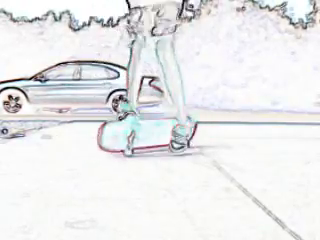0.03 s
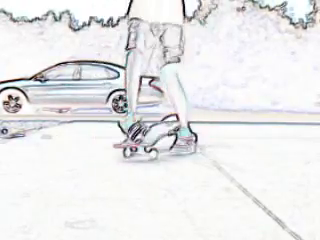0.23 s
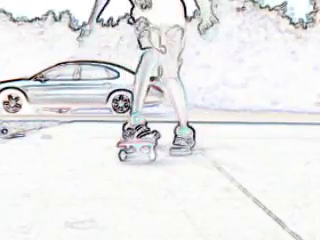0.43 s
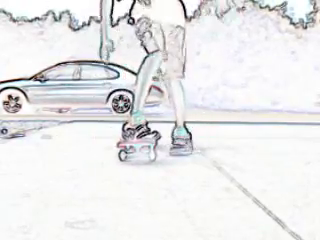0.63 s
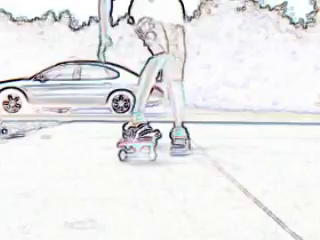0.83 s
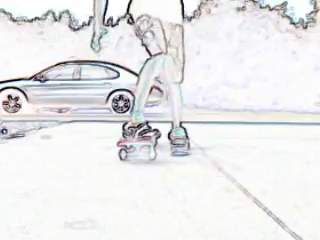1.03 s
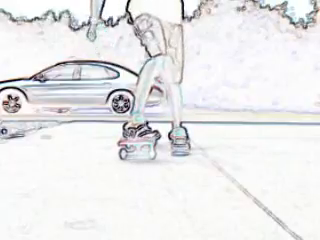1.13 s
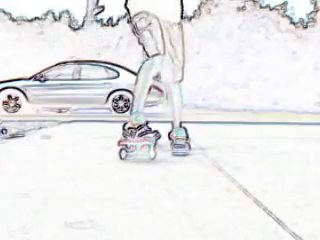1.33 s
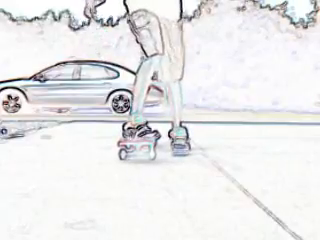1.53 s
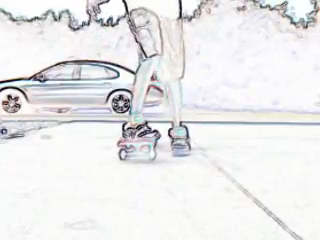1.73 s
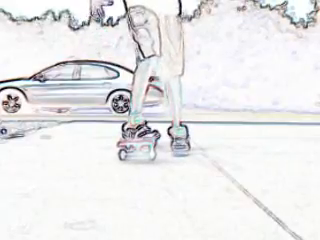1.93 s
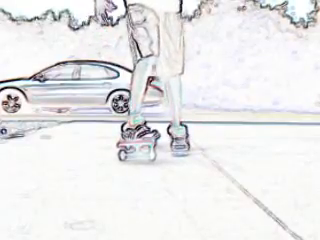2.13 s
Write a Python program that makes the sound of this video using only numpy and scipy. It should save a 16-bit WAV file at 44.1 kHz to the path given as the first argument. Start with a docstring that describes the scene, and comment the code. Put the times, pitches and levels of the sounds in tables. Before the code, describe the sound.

Close up on a quiet street, a skateboard slams down and its deck rattles. A shoe slap and several lighter knocks follow as the wheels scrape and settle, leaving faint grit ticks and a low idling engine.

```python
"""A skateboard lands on concrete: edge and wheels slam in quick turn, the deck rings and shudders.
A shoe slaps down, the tilted board drops back on its wheels with a run of weaker knocks.
Wheels scrape, grit ticks under the sole, a truck creaks as the rider finds balance.
Behind it a quiet street: air, an idling engine, distant machinery and a faint insect."""
import sys
import numpy as np
from scipy import signal
from scipy.fft import rfft, irfft, next_fast_len
from scipy.io import wavfile

SR = 44100
rng = np.random.default_rng(int(sys.argv[2]) if len(sys.argv) > 2 else 0)


def store_wav(level_fs):
    """Save 16-bit WAV to argv[1]."""
    pcm = np.round(np.clip(np.atleast_2d(level_fs), -1, 1) * 32767)
    wavfile.write(sys.argv[1], SR, pcm.T.astype(np.int16))


N = 97020
T = np.arange(N) / SR

# landing blows: start_s, wood_db, click_db
SLAMS = [(0.1177, -29.5, -37), (.124, -19, -31.5), (.128, -14, -53), (0.1321, -29, -20.5),
         (0.1441, -23, -26), (0.1481, -13, -45.5), (0.1516, -6.5, -12), (0.1701, -10.5, -13),
         (0.189, -5.5, -9), (.203, -9, -24), (0.2166, -12, -19.5), (0.28, -19, -27)]
# bounces after the slam: start_s, level_db
SHUDDERS = [(.237, -19), (.274, -24.5), (.3365, -28.5), (.356, -28)]
# sole on the ground: start_s, rubber_db, grit_db
SLAPS = [(0.4086, -25, -46), (.416, -21, -27.5), (.4238, -15.5, -25.5), (0.4315, -15, -30),
         (0.439, -26, -35), (0.4677, -13, -24.5)]
# wheels dropping back: start_s, wood_db, clack_db, click_db
KNOCKS = [(0.5356, -16, -11.5, -22.5), (0.5387, -15, -22, -23.5), (0.5516, -14, -15.5, -26),
          (.5553, -12, -29, -21.5), (0.5594, -14.5, -11.5, -39.5), (0.6156, -25, -22, -33.5),
          (0.6442, -28.5, -22, -32), (.654, -32.5, -24.5, -39), (0.6785, -42, -28, -49),
          (.6905, -29, -20.5, -42)]
# rider's weight arriving: start_s, level_db, pitch_hz, t60_s
THUDS = [(0.1298, -2.5, 244, 0.015), (.1482, -2, 191, 0.019), (0.1717, -6, 202, 0.053),
         (0.19, -3.5, 190, 0.022), (.536, -13.5, 171, .035), (0.553, -18, 106.4, 0.11)]
# wheel friction envelope: time_s, rumble_db, hiss_db
SCRAPE_LEVELS = [(.14, -75, -86), (0.156, -15, -73), (.21, -23.5, -34), (0.261, -27, -51),
                 (.33, -28.5, -44.5), (0.399, -34.5, -48), (.445, -30.5, -50), (.525, -38.5, -57),
                 (.55, -38, -56), (0.57, -23, -38.5), (0.607, -33, -49.5), (0.654, -28, -50),
                 (0.675, -45, -58.5), (.87, -56.5, -72), (1.15, -62, -86)]
# grit under the shoe: start_s, level_db
GRIT_TICKS = [(0.794, -45.5), (0.813, -41.5), (.818, -45), (0.8285, -45.5), (.855, -44.5)]
# rubs as the weight shifts: start_s, length_s, level_db, centre_hz, width_hz
RUBS = [(0.674, 0.088, -44.5, 1140, 650), (0.75, 0.07, -54.5, 520, 70), (1.405, .09, -57, 310, 110),
        (1.56, .4, -68, 1700, 1000), (1.385, 0.26, -66.5, 11500, 4500)]
# truck slips: start_s, level_db
CREAKS = [(0.987, -57), (1.457, -54.5), (1.484, -57)]

# deck and truck modes: pitch_hz, slam_db, drop_db, t60_s
DECK_MODES = [(161.5, -22, -21, 0.32), (183.6, -27.5, -20, 0.271), (317.3, -11, -30.5, 0.18),
              (374, -29.5, -26, 0.41), (532.3, -17, -20.5, 0.22), (590, -19.5, -16.5, 0.19),
              (747.7, -17, -17.5, 0.26), (806, -27, -20.5, 0.208), (964, -19, -52, 0.2),
              (1388, -25, -23, 0.38), (1675, -30, -24, 0.17), (1856, -25.5, -26.5, 0.22),
              (2065, -24, -45, 0.2), (2260, -21.5, -32, 0.21), (2435, -24, -28, 0.096)]
# truck modes: pitch_hz, level_db, t60_s
TRUCK_MODES = [(1070, -1.5, 0.022), (1373, -4.5, 0.028), (1690, -10, 0.028)]
# shoe and leg modes: pitch_hz, level_db, t60_s
SOLE_MODES = [(151, -5, 0.099), (260, -0.5, 0.032), (385, -8, 0.038), (1010, -5, 0.039)]

# contact spectra: freq_hz, relative_db
WOOD_SPECTRUM = [(50, -8.5), (130, -19), (320, 3.5), (470, -14.5), (800, 0), (1300, -8.5), (2300, -11.5),
                 (3100, -17), (4000, -34), (8000, -38)]
CLICK_SPECTRUM = [(1500, -7.5), (3000, -5.5), (5000, -14), (7000, -5.5), (10300, -6), (11500, 5.5),
                  (12800, 0), (14000, -5), (15500, -9), (17000, -24)]
RUBBER_SPECTRUM = [(300, -2), (1000, -11), (1600, -14.5), (2700, -8.5), (5000, -52)]
TRUCK_SPECTRUM = [(60, -5.5), (250, 3.5), (700, -1), (900, -17), (1600, -1.5), (2200, -9.5), (3200, -15),
                  (4500, -30), (8000, -29)]
RATTLE_SPECTRUM = [(35, 1), (90, 1.5), (370, 0), (800, -5.5), (1300, -8.5), (2300, -17.5), (3300, -23.5),
                   (4800, -34), (9000, -33.5)]
TICK_SPECTRUM = [(3000, -11), (5800, -2), (12000, -4), (16000, -17)]

# outdoor air: freq_hz, relative_db
AIR_SPECTRUM = [(15, -35), (25, -1.5), (105, -1), (141, -11.5), (309, -19.5), (700, -22.5), (1650, -25),
                (4700, -30.5), (11600, -32), (16000, -34.5)]
# steady hums: centre_hz, level_db, width_hz
HUMS = [(735, -70, 90), (1700, -77.5, 117.6), (8360, -76.5, 700)]
# distant machinery: pitch_hz, level_db
WHINES = [(716, -68), (3650, -76.5)]
# street envelope: time_s, gain_db
STREET_GAIN = [(0, 0.5), (.95, 1), (1.7, 0), (2.2, -1.5)]

PINNED_UNTIL_S, PINNED_DB = 0.145, -30.5  # foot damps the deck
THUD_LOW_CUT_HZ, NEAR_LOW_CUT_HZ, CUTOFF_HZ = 135, 40, 16100
GRAINS_PER_S, GRAIN_SPREAD_DB, SMOOTH_GAIN = 1800, 4.5, 0.72
RATTLE_T60_S, RATTLE_DIRECT_GAIN = 0.13, 0.8
GROWL_DB, GROWL_HZ, GROWL_WIDTH_HZ = -12, 94, 32  # level relative to rumble
REVERB_DB, REVERB_T60_S, REVERB_DELAY_S = -33.5, 0.9, 0.03
AIR_DB, WHINE_WOBBLE_RATIO = -53.5, 0.0042
ENGINE_HZ, ENGINE_DB, ENGINE_WOBBLE_HZ = 89.1, -52, 3.03
INSECT_HZ, INSECT_WIDTH_HZ, INSECT_PULSES_PER_S, INSECT_DB = 4350, 200, 110, -72.5


def landing():
    """Edge and wheels hit concrete and bounce; the deck rings once free of the foot."""
    start_s, wood_db, click_db = np.transpose(SLAMS)
    damping_db = PINNED_DB * (start_s < PINNED_UNTIL_S)
    modes = [(hz, slam_db, t60_s) for hz, slam_db, _, t60_s in DECK_MODES]
    wood = contacts(start_s, wood_db, WOOD_SPECTRUM,
                    snap=5.0, crack_s=0.0034, tail_db=damping_db - 17, t60_s=0.072)
    deck = ring(modes, start_s, wood_db + damping_db)
    click = contacts(start_s, click_db, CLICK_SPECTRUM,
                     snap=0.69, crack_s=0.0014, tail_db=damping_db - 23.5, t60_s=0.2)
    return wood + deck + click


def shudder():
    """Smeared bounces keep the deck ringing."""
    start_s, level_db = np.transpose(SHUDDERS)
    modes = [(hz, slam_db, t60_s) for hz, slam_db, _, t60_s in DECK_MODES]
    wood = contacts(start_s, level_db, WOOD_SPECTRUM, snap=0.6, crack_s=0.0085, tail_db=-15, t60_s=0.1)
    return wood + ring(modes, start_s, level_db)


def shoe():
    """Heel and toe slap down, dry and dull; grit sizzles under the sole."""
    start_s, rubber_db, grit_db = np.transpose(SLAPS)
    sole = sum(amp(db) * damped_sine(hz, t60_s) for hz, db, t60_s in SOLE_MODES)
    thump = convolve(impulses(start_s, rubber_db), sole)
    slap = contacts(start_s, rubber_db, RUBBER_SPECTRUM,
                    snap=1.8, crack_s=0.0084, tail_db=-6.5, t60_s=0.092)
    grit = contacts(start_s, grit_db, CLICK_SPECTRUM, snap=0.66, crack_s=0.0025, tail_db=-4, t60_s=0.076)
    return thump + amp(-11.5) * slap + grit


def settling():
    """The board drops flat; its trucks clack to rest."""
    start_s, wood_db, clack_db, click_db = np.transpose(KNOCKS)
    modes = [(hz, drop_db, t60_s) for hz, _, drop_db, t60_s in DECK_MODES]
    knock = contacts(start_s, wood_db, TRUCK_SPECTRUM,
                     snap=1.8, crack_s=0.0032, tail_db=-22, t60_s=0.033)
    deck = ring(modes, start_s, wood_db)
    clack = ring(TRUCK_MODES, start_s, clack_db)
    click = contacts(start_s, click_db, CLICK_SPECTRUM,
                     snap=0.84, crack_s=0.0029, tail_db=-27.5, t60_s=0.052)
    return knock + deck + clack + click


def thuds():
    """The rider's weight lands as low, heavily damped pushes."""
    pushes = sum(convolve(impulses([start_s], [db]), damped_sine(hz, t60_s))
                 for start_s, db, hz, t60_s in THUDS)
    return low_cut(pushes, THUD_LOW_CUT_HZ, order=1)


def grains():
    """Tiny uneven collisions over smooth hiss; rms 1."""
    sizes = amp(GRAIN_SPREAD_DB * np.minimum(rng.exponential(1, N), 4)) * rng.choice([-1, 1], N)
    hits = rng.random(N) < GRAINS_PER_S / SR
    return unit_rms(unit_rms(sizes * hits) + SMOOTH_GAIN * rng.standard_normal(N))


def wheel_scrape():
    """Wheels growl and skid on rough concrete, shaking the board's many small resonances."""
    time_s, rumble_db, hiss_db = np.transpose(SCRAPE_LEVELS)
    rumble_gain = amp(np.interp(T, time_s, rumble_db))
    hiss_gain = amp(np.interp(T, time_s, hiss_db))
    grit = grains()
    ringing = unit_rms(convolve(grit, noise_tail(RATTLE_T60_S)))
    rattle = unit_rms(RATTLE_DIRECT_GAIN * grit + ringing)
    growl = amp(GROWL_DB) * rumble_gain * band_noise(GROWL_HZ, GROWL_WIDTH_HZ)
    rumble = colour(rattle * rumble_gain, RATTLE_SPECTRUM)
    hiss = colour(rattle * hiss_gain, CLICK_SPECTRUM)
    return growl + rumble + hiss


def weight_shift():
    """Grit ticks and soft rubs as the rider finds balance."""
    tick_s, tick_db = np.transpose(GRIT_TICKS)
    out = contacts(tick_s, tick_db, TICK_SPECTRUM, snap=2, crack_s=0.0011, tail_db=-16.5, t60_s=0.11)
    for start_s, length_s, db, hz, width_hz in RUBS:
        progress = np.clip((T - start_s) / length_s, 0, 1)
        swell = np.sqrt(np.abs(np.sin(np.pi * progress)))
        out += amp(db) * swell * band_noise(hz, width_hz)
    return out


def truck_creak():
    """Each slip briefly sounds the truck's highest mode."""
    start_s, level_db = np.transpose(CREAKS)
    envelope = convolve(impulses(start_s, level_db), decay(t60_s=0.054))
    return envelope * band_noise(TRUCK_MODES[-1][0], width_hz=310)


def reverb(x):
    """Faint tail off walls and cars."""
    tail = noise_tail(REVERB_T60_S) * (T > REVERB_DELAY_S)
    tail = colour(tail, [(100, -23), (1200, -6), (14000, -5.5)])
    return amp(REVERB_DB) * convolve(x, tail / np.sqrt(np.sum(tail ** 2)))


def street():
    """Outdoor air, an idling engine, hums, machinery whines and a throbbing insect."""
    air = amp(AIR_DB) * colour(rng.standard_normal(N), AIR_SPECTRUM)
    engine = amp(ENGINE_DB) * wandering_tone(ENGINE_HZ, ENGINE_WOBBLE_HZ)
    hums = sum(amp(db) * band_noise(hz, width_hz) for hz, db, width_hz in HUMS)
    whines = sum(amp(db) * wandering_tone(hz, WHINE_WOBBLE_RATIO * hz) for hz, db in WHINES)
    pulse_hz = INSECT_PULSES_PER_S + 8 * band_noise(0, width_hz=10)
    throb = 1 + 0.44 * np.sin(2 * np.pi * np.cumsum(pulse_hz) / SR)
    insect = amp(INSECT_DB) * throb * band_noise(INSECT_HZ, INSECT_WIDTH_HZ)
    gain = amp(np.interp(T, *np.transpose(STREET_GAIN)))
    return gain * (air + engine + hums + whines + insect)


def contacts(start_s, level_db, spectrum, snap, crack_s, tail_db, t60_s):
    """Each contact is a snap and a short crack; all share one dense decaying tail."""
    hits = impulses(start_s, level_db)
    crack_power = np.maximum(convolve(hits ** 2, np.exp(-2 * T / crack_s)), 0)
    tail = convolve(impulses(start_s, level_db + tail_db), noise_tail(t60_s))
    crack = np.sqrt(crack_power) * rng.choice([-1, 1], N)
    return colour(snap * hits + crack + tail, spectrum)


def ring(modes, start_s, level_db, spread_db=1.5):
    """Each blow rings all modes at scattered strengths; polarity alternates by mode."""
    out = np.zeros(N)
    for k, (hz, mode_db, t60_s) in enumerate(modes):
        strike_db = level_db + mode_db + spread_db * rng.standard_normal(len(level_db))
        out += (-1) ** k * convolve(impulses(start_s, strike_db), damped_sine(hz, t60_s))
    return out


def colour(x, spectrum):
    """Minimum-phase filter; white noise keeps its level."""
    size = next_fast_len(2 * N) * 2
    hz, db = np.transpose(spectrum)
    grid_hz = np.maximum(np.arange(size // 2 + 1) * SR / size, 1)
    gain = unit_rms(amp(np.interp(np.log(grid_hz), np.log(hz), db)))
    cepstrum = irfft(np.log(gain))
    cepstrum[1:size // 2] *= 2
    cepstrum[size // 2 + 1:] = 0
    return irfft(rfft(x, size) * np.exp(rfft(cepstrum)))[:N]


def band_noise(hz, width_hz):
    """Noise twice through one resonance; rms 1."""
    grid_hz = np.arange(N // 2 + 1) * SR / N
    detuning = 2 * (grid_hz - hz) / width_hz
    return unit_rms(irfft(rfft(rng.standard_normal(N)) / (1 + detuning ** 2), N))


def wandering_tone(hz, wobble_hz):
    """Sine with random pitch drift; rms 1."""
    pitch_hz = hz + wobble_hz * band_noise(0, width_hz=20.2)
    return np.sqrt(2) * np.sin(2 * np.pi * np.cumsum(pitch_hz) / SR)


def impulses(start_s, level_db):
    out = np.zeros(N)
    np.add.at(out, (np.asarray(start_s) * SR).astype(int), amp(level_db))
    return out


def decay(t60_s):
    return np.exp(-np.log(1000) * T / t60_s)


def damped_sine(hz, t60_s):
    return np.sin(2 * np.pi * hz * T) * decay(t60_s)


def noise_tail(t60_s):
    return rng.standard_normal(N) * decay(t60_s)


def convolve(x, response):
    return signal.fftconvolve(x, response)[:N]


def low_cut(x, hz, order):
    return signal.sosfilt(signal.butter(order, hz, "high", fs=SR, output="sos"), x)


def amp(db):
    return 10 ** (np.asarray(db) / 20)


def unit_rms(x):
    return x / np.sqrt(np.mean(x ** 2) + 1e-20)


def scene():
    """Board and rider close by, too small to radiate deep bass; the street behind."""
    impacts = landing() + shudder() + shoe() + settling() + thuds()
    friction = wheel_scrape() + weight_shift() + truck_creak()
    near = low_cut(impacts + friction, NEAR_LOW_CUT_HZ, order=2)
    return (near + reverb(near) + street())[None]


def record(dry):
    """Peak clipping, then a steep low-pass."""
    low_pass = signal.ellip(12, 0.1, 80, CUTOFF_HZ, fs=SR, output="sos")
    return signal.sosfilt(low_pass, np.clip(dry, -0.95, 0.95))


dry = scene()
out = record(dry)
store_wav(out)
```